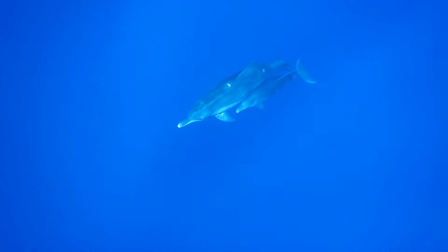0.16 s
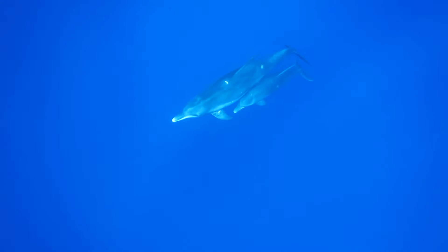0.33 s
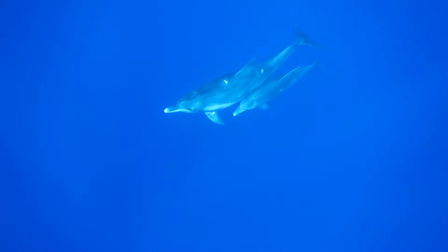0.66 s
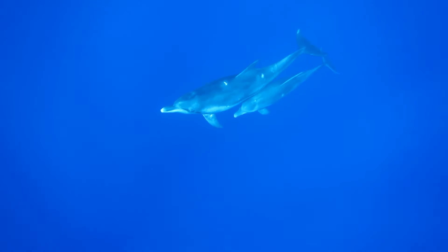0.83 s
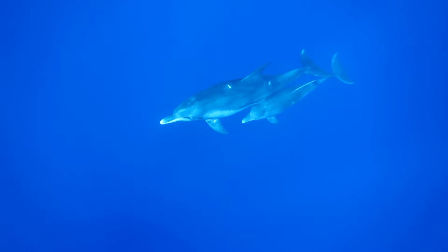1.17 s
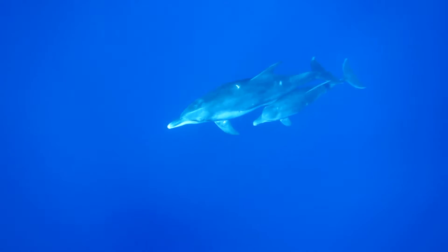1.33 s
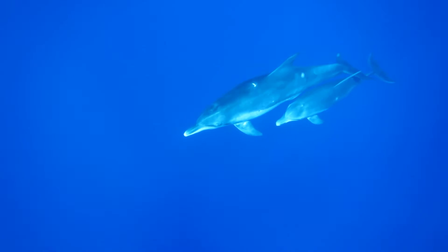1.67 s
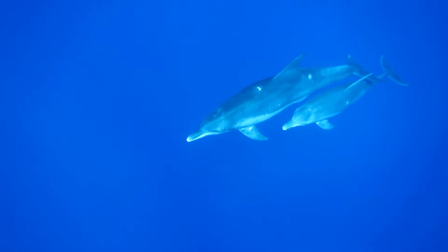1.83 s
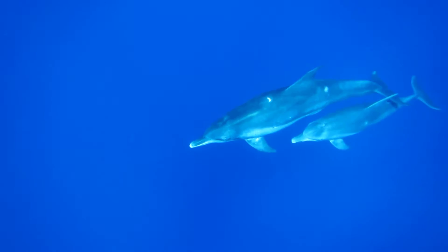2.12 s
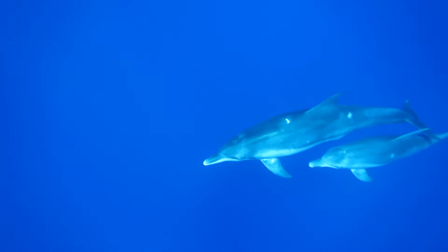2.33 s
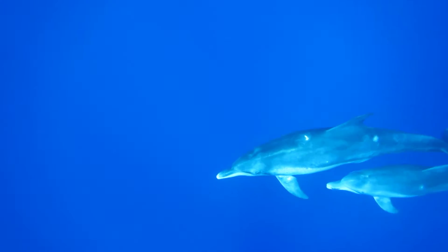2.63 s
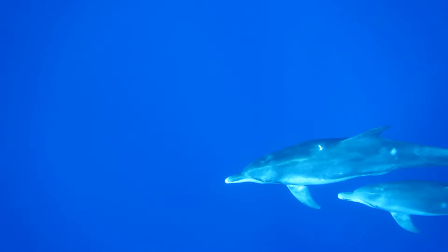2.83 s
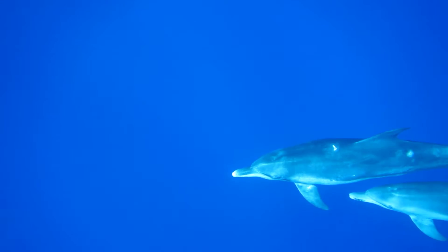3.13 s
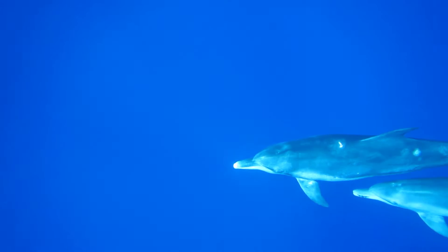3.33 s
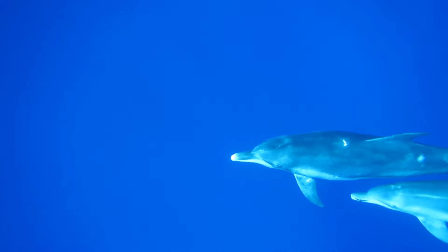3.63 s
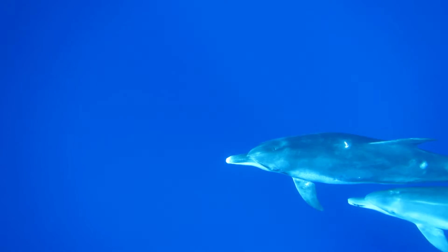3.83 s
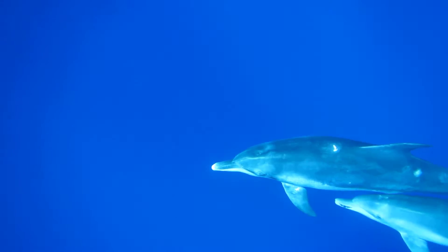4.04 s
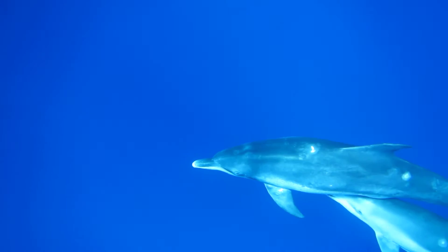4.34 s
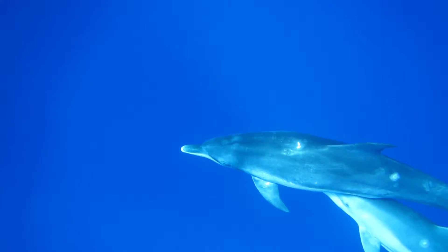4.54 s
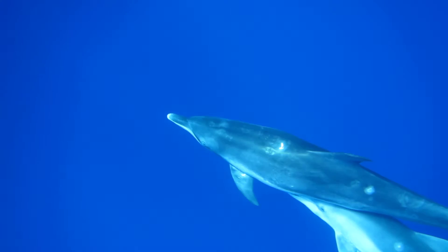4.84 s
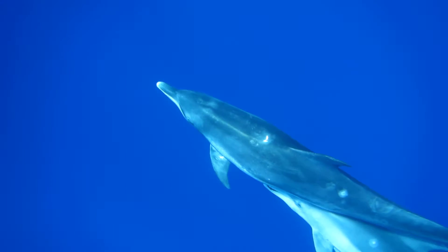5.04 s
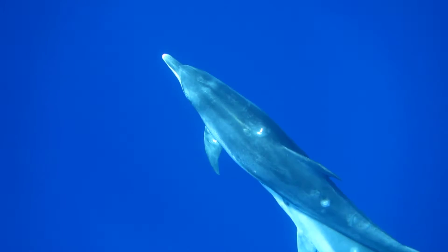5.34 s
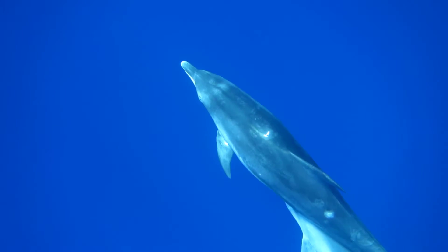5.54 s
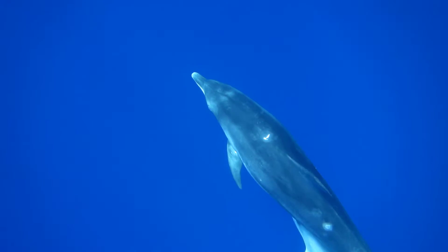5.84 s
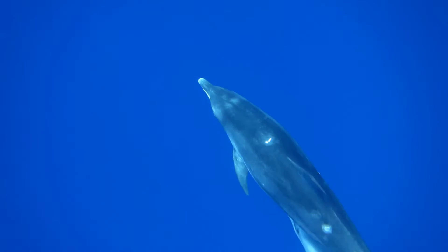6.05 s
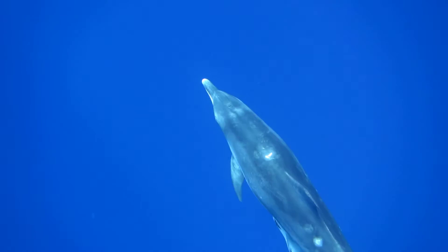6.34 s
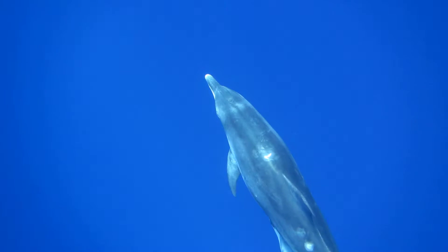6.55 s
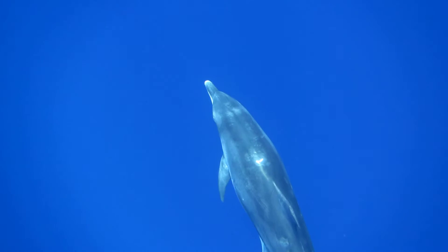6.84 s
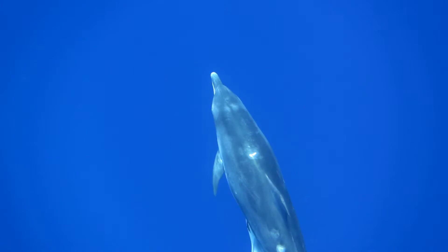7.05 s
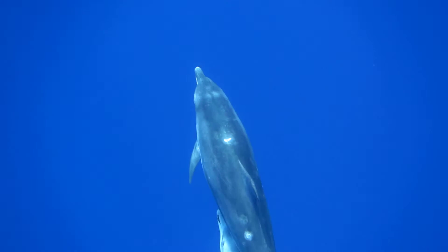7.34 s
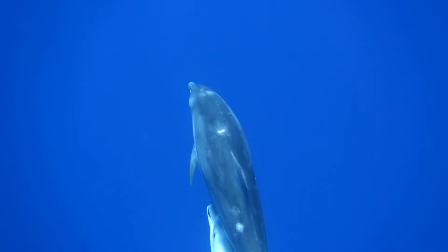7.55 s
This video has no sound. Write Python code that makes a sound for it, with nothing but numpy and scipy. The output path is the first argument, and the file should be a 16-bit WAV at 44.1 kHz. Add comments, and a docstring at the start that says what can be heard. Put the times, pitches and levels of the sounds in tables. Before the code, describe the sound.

Muffled underwater wash and a hollow hum, with housing knocks, scattered dolphin clicks, and low turbulent thumps growing as the water rushes faster.

```python
"""Dolphins click near a camera held under water; each sharp pulse brings scattered surface echoes and a dull tail.
Knocks excite damped modes of the housing and hard ones crack; pips and scrapes are brief pulses and grit.
A small motor ticks as decaying modes and whines as a faint sine. Ever faster water adds rumble, thumps, wash,
fizz and hiss, shaped from noise and low sines, over a housing hum. A limiter ducks everything after a peak."""
import sys
import numpy as np
from scipy import signal
from scipy.fft import rfft, irfft
from scipy.io import wavfile
from scipy.ndimage import uniform_filter1d, minimum_filter1d

SR = 44100
rng = np.random.default_rng(int(sys.argv[2]) if len(sys.argv) > 2 else 0)


def generate_wav(signal):
    """Clip the signal to [-1, 1] and save it as 16-bit WAV at the path in sys.argv[1]."""
    frames = np.transpose(np.atleast_2d(signal))
    scaled = np.clip(frames, -1, 1) * 32767
    pcm = np.round(scaled).astype(np.int16)
    wavfile.write(sys.argv[1], SR, pcm)


N = 338688
T = np.arange(N) / SR  # time over the whole scene, s
BRIEF = T[:SR // 4]  # time within one short sound, s

# Dolphin clicks, with bands relative to the body and echo relative to the click:
# [start_s, level_db, bright_db, snap_db, echo_db, echo_span_s]
CLICKS = [ (2.067, -21.5, -30, -40, -3.5, 0.015), (2.1875, -16, -17.5, -39, -3.5, 0.012),
          (2.4708, -19, -26, -35, -11.5, 0.0064), (2.587, -20.5, -26, -34, -22, .006),
          (3.2267, -18, -27, -38, -15, .006), (3.3875, -20, -29, -34, -13, 0.0056),
          (4.788, -6.5, -8.5, -35.5, 1.5, 0.014), (5.1067, -11.5, -20, -31.5, -1.5, 0.01),
          (6.258, -20.5, -4.5, -40, -1, 0.028), (6.327, -23, -2.5, -40, 3, 0.021),
          (7.0359, -16, -6, -27.5, 3, 0.009), (7.063, -16.5, -23, -46, -6, 0.0069)]
# Spectra of a click's body, bright band and treble snap: [frequency_hz, level_db]
CLICK_BODY_SPECTRUM = [(300, -24.5), (520, -7.5), (660, 2), (850, -4.5), (1050, -23.5), (1400, -22),
                       (2200, -54.5)]
CLICK_BRIGHT_SPECTRUM = [(700, -32.5), (1150, 7.5), (1550, 2.5), (1950, -3), (2250, -23.5), (3200, -41),
                         (5300, -41), (6500, -50)]
CLICK_SNAP_SPECTRUM = [(5000, -34), (7000, -16), (8200, 4), (9000, -8.5), (9800, 4), (11000, -19.5),
                       (14000, -23)]
FAR_ECHO_DB, FAR_ECHO_S = -5, 0.04  # dull tail: level relative to the echoes, span

# Knocks on the housing; the rows that ring longest are swells of its hum: [start_s, level_db, ring_hz, t60_s,
# swell_s, overtone_db]
KNOCKS = [ (.496, -11, 475, 0.021, 0.0065, -44), (0.542, -19, 454, 0.19, 0.0044, -34),
          (0.627, -8.5, 497, 0.11, 0.003, -51), (0.8804, 11, 488, 0.047, 0.0023, -29),
          (.9145, 6, 485, 0.047, 0.0045, -42), (.94, -3, 490, 0.048, .0035, -45),
          (.965, -6.5, 479, 0.058, .0039, -44), (1.1137, 0.3, 489, .055, 0.0043, -43.5),
          (1.134, -7.5, 490, 0.11, .0086, -37.5), (1.5177, -5, 538, 0.044, .0013, -28),
          (1.888, -14.5, 497, 0.06, 0.0076, -38), (2.992, -18, 474.5, 0.13, .0026, -17),
          (3.294, -12.5, 415, 0.021, 0.0018, -26), (3.662, -17, 530, 0.094, 0.0019, -21),
          (5.131, -20.5, 527, 0.26, 0.0038, -2), (6.512, -4.5, 324, 0.016, 0.0013, -33),
          (6.536, -6.5, 420, 0.016, 0.0023, -34), (6.5807, -3.5, 540, 0.043, 0.00061, 0),
          (6.626, -7.5, 536, 0.037, 0.003, -2), (6.671, -17.5, 494, 0.071, 0.00072, -6),
          (7.2481, -8.5, 550, 0.028, 0.004, -29), (7.307, -11.5, 478, 0.18, 0.0029, -16),
          (7.354, -6, 490, 0.069, 0.0025, -23), (7.4384, -1, 460, 0.031, 0.0032, -11.5),
          (7.511, -10, 489, .073, 0.0029, -11), (7.6194, -4, 406, 0.082, 0.0041, -17)]
# Spectrum of the crack in a hard knock: [frequency_hz, level_db]
CRACK_SPECTRUM = [(300, 5.5), (700, 7.5), (1400, 4), (2000, 0), (2900, -7.5), (3500, -17.5), (8000, -24),
                  (15000, -32.5)]
OVERTONE_HZ, OVERTONE_T60_S = 866, 0.035
# A 0 dB knock swelling in HARD_SWELL_S cracks at CRACK_DB; CRACK_GROWTH is dB of crack per dB of hardness
CRACK_DB, CRACK_GROWTH, HARD_SWELL_S, CRACK_DECAY_S = -31, 2.31, 0.0019, 0.0024

# Thin dry pips: [start_s, level_db]
PIPS = [(1.3878, -33.5), (1.7248, -44.5), (5.6283, -33), (6.514, -20), (6.663, -39)]
# Brief scrapes on the housing: [start_s, level_db, decay_s]
SCRAPES = [(.832, -57.5, 0.0023), (1.5164, -51.5, 0.0013), (6.578, -30.5, 0.0022), (6.615, -39.5, 0.0023),
           (6.625, -44, 0.0069)]
# Spectra of a pip and of the pulses in a scrape: [frequency_hz, level_db]
PIP_SPECTRUM = [(300, 0), (1000, 8.5), (3000, -11.5), (8000, -19.5), (15500, -25)]
SCRAPE_SPECTRUM = [(1500, -17), (2600, 14), (4000, -16.5), (5600, 1), (7600, -8), (10000, -17.5),
                   (15000, -32.5)]

# Motor ticks: [start_s, level_db, upper_modes_db]
TICKS = [(2.1776, -31, -4), (2.625, -31.5, -2), (3.9703, -27.5, 5), (4.919, -26, 8), (6.8496, -22.5, 5),
         (7.5888, -21, 8)]
# Damped modes of a tick: [frequency_hz, relative_level_db, t60_s]
TICK_MODES = [(1245, 8, 0.0038), (1574, 7.5, 0.0075), (2244, -7, 0.0045), (3060, -26, 0.0049),
              (5350, -29, .004), (6720, -26.5, 0.0032)]
# Motor runs: [start_s, stop_s, level_db, run_up_s]
MOTOR_RUNS = [(0.99, 2.183, -72, 0.32), (2.622, 3.971, -68.5, 0.0046), (4.92, 6.854, -63.5, .005),
              (7.588, 7.673, -60, 0.0039)]
MOTOR_HZ, WHINE_STEP_DB, WHINE_STEPS_PER_S = 12408, 3, 9

# Surges of turbulence: [crest_s, half_length_s, deep_db, upper_db]
SURGES = [(0.448, 0.045, -41.5, -35.5), (0.819, 0.055, -34.5, -34.5), (1.777, .04, -42, -34),
          (2.157, 0.11, -48, -34.5), (2.789, .08, -28.5, -47.5), (3.296, .04, -29.5, -25.5),
          (3.515, 0.1, -49, -27), (4.357, 0.16, -52, -37), (4.52, 0.032, -31.5, -34.5),
          (4.763, 0.036, -26, -36.5), (4.978, 0.02, -25.5, -54), (5.232, 0.044, -17.5, -26.5),
          (5.496, 0.087, -16, -25), (5.753, 0.042, -36, -35.5), (5.925, 0.096, -21, -29),
          (6.123, 0.13, -25, -35), (6.533, 0.051, -38, -27.5), (6.85, 0.096, -38, -27.5),
          (7.257, 0.059, -32, -25.5), (7.453, 0.025, -22, -29), (7.524, 0.045, -38.5, -24.5)]
# Single big eddies that thump the housing: [crest_s, level_db, pitch_hz, half_length_s]
THUMPS = [(.275, -22, 100, .014), (3.298, -19, 140, .012), (3.47, -22, 150, .035), (3.585, -22, 160, .025),
          (4.025, -22, 150, .010), (4.8445, -12, 65, .010), (5.2125, -5, 92, .009), (5.258, -7, 50, .015),
          (5.511, -1.5, 85, .010), (5.49, -8, 50, .015), (5.56, -11, 95, .009), (5.913, -13, 100, .010),
          (6.055, -16, 115, .016), (6.335, -23, 140, .014)]
# Spectra of the deep and upper rumble: [frequency_hz, density_db_per_hz]
DEEP_SPECTRUM = [(10, -9), (25, 3), (55, -5), (85, 1), (130, -17.5), (250, -53)]
UPPER_SPECTRUM = [(60, -26.5), (100, -1), (135, 1), (170, -1), (220, -12.5), (400, -28)]
CHURN_WANDER_DB, CHURN_WANDER_PER_S = 3.5, 11

# Strength of the flow past the housing: [time_s, strength_db]
FLOW = [(0, -14.5), (1.6, -12), (3.3, -6.5), (4.7, -3), (6.1, -1.5), (7.68, 0.5)]
# Level of the housing's hum: [time_s, level_db]
HUM_LEVEL = [(0, -31.5), (.25, -34), (.6, -27), (.85, -29), (1.1, -31.5), (2.0, -33.5), (2.65, -30),
             (3.15, -30.5), (3.5, -33), (4.3, -33.5), (5.5, -34), (5.8, -30.5), (6.4, -32), (6.95, -32.5),
             (7.25, -27.5), (7.68, -29.5)]
# Spectra of hum, wash, fizz and hiss: [frequency_hz, density_db_per_hz]
HUM_SPECTRUM = [(150, -29.5), (240, -17), (330, -11.5), (410, -7.5), (465, -3), (505, 1.5), (550, -3),
                (600, -10.5), (660, -8.5), (740, -13.5), (800, -38.5), (950, -43.5), (1400, -47.5)]
WASH_SPECTRUM = [(550, -6), (760, 5.5), (865, 8.5), (1000, -3.5), (1060, -4), (1110, -10), (1170, -1),
                 (1280, -6), (1500, -9.5), (1900, -27), (2300, -26.5), (2700, -38.5), (3000, -38),
                 (3600, -48)]
FIZZ_SPECTRUM = [(2000, 2), (2400, 10), (2800, 4), (3400, -9.5), (4200, -6), (5100, 2), (7500, 0),
                 (8400, -1), (9000, -3.5), (12000, -5), (15500, -3)]
HISS_SPECTRUM = [(3500, -16), (7000, -15.5), (8200, -7), (8900, -16.5), (9600, -6), (10050, -2.5),
                 (10900, -14), (15500, -16.5)]
# Each layer's level at a flow of 0 dB, and its growth in dB per dB of flow
DEEP_DB, DEEP_GROWTH = -39.5, 0.47
UPPER_DB, UPPER_GROWTH = -40, 0.68
WASH_DB, WASH_GROWTH = -39, 1.0
FIZZ_DB, FIZZ_GROWTH = -67, 1.6
HISS_DB, HISS_GROWTH = -72, 0.96

LIMIT_DB, RECOVERY_DB_PER_S, TOP_HZ = 0.5, 11.5, 15850


def dolphins():
    """Multipath: a direct click, then surface echoes without its treble snap, and a dull tail."""
    out = np.zeros(N)
    body = impulse(CLICK_BODY_SPECTRUM)
    bright = impulse(CLICK_BRIGHT_SPECTRUM)
    snap = impulse(CLICK_SNAP_SPECTRUM)
    for s, db, bright_db, snap_db, echo_db, span in CLICKS:
        click = undb(db) * (body + undb(bright_db) * bright)
        echoes = undb(echo_db) * scatter(click, span)
        dull_tail = undb(db + echo_db + FAR_ECHO_DB) * scatter(body, FAR_ECHO_S)
        treble_snap = undb(db + snap_db) * burst(snap, decay=.0014)
        for part in (click, echoes, dull_tail, treble_snap):
            add(out, s, part)
    return out


def knocks():
    """Modal excitation: a blow rings a main mode and an overtone; strong, sudden blows also crack."""
    out = np.zeros(N)
    crack = impulse(CRACK_SPECTRUM)
    for s, db, hz, t60, swell, overtone_db in KNOCKS:
        main_mode = ring(hz, t60, swell)
        overtone = undb(overtone_db) * ring(OVERTONE_HZ, OVERTONE_T60_S, swell)
        add(out, s, undb(db) * (main_mode + overtone))
        hardness_db = db + 20 * np.log10(HARD_SWELL_S / swell)
        crack_db = CRACK_DB + CRACK_GROWTH * hardness_db
        add(out, s + swell, undb(crack_db) * burst(crack, CRACK_DECAY_S))
    return out


def crackles():
    """Brief pulses: a pip is one thin dry click, a scrape on the housing a decaying cluster of pulses."""
    out = np.zeros(N)
    pip, scrape = impulse(PIP_SPECTRUM), impulse(SCRAPE_SPECTRUM)
    for s, db in PIPS:
        add(out, s, undb(db) * pip)
    for s, db, decay in SCRAPES:
        add(out, s, undb(db) * burst(scrape, decay))
    return out


def motor():
    """Transient and steady tone: ticks are sums of damped modes, the whine a sine stepping in level."""
    out = np.zeros(N)
    for s, db, upper_db in TICKS:
        tick = 0
        for hz, mode_db, t60 in TICK_MODES:
            gain = undb(mode_db + upper_db * (hz > 4000))  # upper modes vary from tick to tick
            tick = tick + gain * ring(hz, t60, swell=.0016)
        add(out, s, undb(db) * unit(tick))
    steps = rng.choice([-1., 1.], size=256)[(T * WHINE_STEPS_PER_S).astype(int)]
    step_gain = undb(WHINE_STEP_DB * uniform_filter1d(steps, size=200))
    whine = np.sin(2 * np.pi * MOTOR_HZ * T) * step_gain
    for start, stop, db, run_up in MOTOR_RUNS:
        running = np.clip((T - start) / run_up, 0, 1) * (T < stop)
        out += whine * undb(db) * running
    return out


def rumble():
    """Turbulent pressure: churning noise grows with flow and surges; the biggest eddies thump singly."""
    wander = undb(CHURN_WANDER_DB * walk(CHURN_WANDER_PER_S))
    deep = wander * flow_gain(DEEP_DB, DEEP_GROWTH)
    upper = wander * flow_gain(UPPER_DB, UPPER_GROWTH)
    for s, half, deep_db, upper_db in SURGES:
        swell = bell(s, half)
        deep = np.hypot(deep, undb(deep_db) * swell)  # independent levels add in power
        upper = np.hypot(upper, undb(upper_db) * swell)
    out = deep * even(noise(DEEP_SPECTRUM), size=3500)
    out += upper * even(noise(UPPER_SPECTRUM), size=3500)
    for s, db, hz, half in THUMPS:
        swell = bell(s, half)
        thump = undb(db) * np.sin(2 * np.pi * hz * (T - s)) * swell
        out = out * (1 - swell) + thump  # a big eddy sweeps the small ones away
    return out


def water():
    """Flow noise: wash, fizz and fine hiss grow with the flow, while the housing hums at its own level."""
    hum_gain = undb(np.interp(T, *np.transpose(HUM_LEVEL)))
    hum = even(noise(HUM_SPECTRUM), size=5500) * hum_gain
    wash = noise(WASH_SPECTRUM) * flow_gain(WASH_DB, WASH_GROWTH) * undb(0.48 * walk(30))
    fizz = noise(FIZZ_SPECTRUM) * flow_gain(FIZZ_DB, FIZZ_GROWTH)
    hiss = noise(HISS_SPECTRUM) * flow_gain(HISS_DB, HISS_GROWTH)
    return hum + wash + fizz + hiss


def scatter(click, span):
    """Diffuse reflection: random facets echo a click; their gains have unit total energy."""
    facets = rng.standard_normal(len(BRIEF)) * (BRIEF > .002) * np.exp(-(BRIEF / span) ** 2)
    return signal.fftconvolve(click, facets / np.linalg.norm(facets))


def burst(pulse, decay):
    """Superposition: a dense, quickly fading cluster of one pulse, scaled to a peak of one."""
    grit = rng.standard_normal(len(BRIEF)) * np.exp(-BRIEF / decay)
    return unit(signal.fftconvolve(grit, pulse))


def ring(hz, t60, swell):
    """Damped oscillation: a soft push lets the mode swell before it fades by 60 dB in t60."""
    age = np.maximum(BRIEF - swell, 0)
    push = 1 - np.exp(-(BRIEF / swell) ** 2)
    fade = np.exp(-np.log(1000) * age / t60)
    return np.sin(2 * np.pi * hz * BRIEF) * push * fade


def impulse(points, size=2048):
    """Minimum phase: folding the cepstrum gives the most compact causal pulse of this spectrum."""
    cepstrum = irfft(np.log(shape(points, size)))
    cepstrum[1:size // 2] *= 2
    cepstrum[size // 2 + 1:] = 0
    return unit(irfft(np.exp(rfft(cepstrum))))


def noise(points):
    """Spectral shaping: white noise filtered to this spectrum, with an rms of one."""
    x = irfft(rfft(rng.standard_normal(N)) * shape(points, N), N)
    return x / x.std()


def shape(points, size):
    """Frequency response: gain interpolated over log frequency, falling steeply beyond the ends."""
    hz, db = np.transpose(points)
    f = np.maximum(np.fft.rfftfreq(size, 1 / SR), 1)
    skirt = np.minimum(1, np.minimum(f / hz[0], hz[-1] / f)) ** 4
    return undb(np.interp(np.log(f), np.log(hz), db)) * skirt + 1e-5  # small floor keeps the log finite


def flow_gain(db, growth):
    """Power law: the gain over time of a layer whose level follows the flow."""
    return undb(db + growth * np.interp(T, *np.transpose(FLOW)))


def walk(rate):
    """Random modulation: smoothed steps at this rate per second drift with a spread of one."""
    k = int(SR / rate)
    x = uniform_filter1d(np.repeat(rng.standard_normal(N // k + 1), k), k)[:N]
    return x / x.std()


def even(x, size):
    """Level normalization: a near-constant rms over this many samples; quicker gurgles remain."""
    return x / np.sqrt(uniform_filter1d(x ** 2, size=size))


def bell(s, half):
    """Gaussian envelope: a smooth rise and fall around a crest."""
    return np.exp(-((T - s) / half) ** 2)


def undb(db):
    """Logarithmic level: decibels to amplitude gain."""
    return 10 ** (np.asarray(db) / 20)


def unit(x):
    """Peak normalization: scale to a peak of one."""
    return x / np.max(np.abs(x))


def add(out, s, sound):
    """Linear superposition: mix a sound in at a given time."""
    i = int(np.clip(s * SR, 0, N - 1))
    out[i:i + len(sound)] += sound[:N - i]


def limiter(x):
    """Peak limiting: gain drops just ahead of a peak over the limit, then climbs at a steady rate."""
    over_db = 20 * np.log10(np.maximum(np.abs(x[0]) / undb(LIMIT_DB), 1))
    climb_db = RECOVERY_DB_PER_S * T
    gain_db = climb_db - np.maximum.accumulate(over_db + climb_db)
    early_gain_db = minimum_filter1d(gain_db, size=150)
    return x * undb(uniform_filter1d(early_gain_db, size=150))


def scene():
    """Superposition: all sources sum at one microphone inside the housing."""
    return (dolphins() + knocks() + crackles() + motor() + rumble() + water())[None]


def record(dry):
    """Limiting and band limitation: loud peaks duck the mix, then a steep low-pass cuts the top."""
    top_cut = signal.ellip(8, .2, 70, TOP_HZ, fs=SR, output="sos")
    return signal.sosfilt(top_cut, limiter(dry))


dry = scene()
out = record(dry)
generate_wav(out)
```